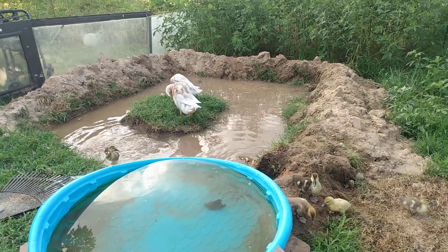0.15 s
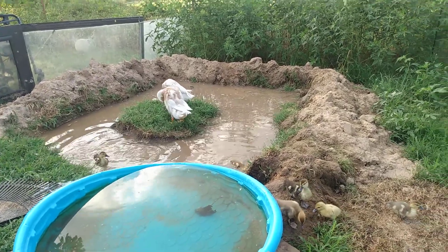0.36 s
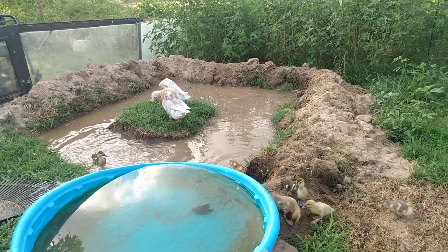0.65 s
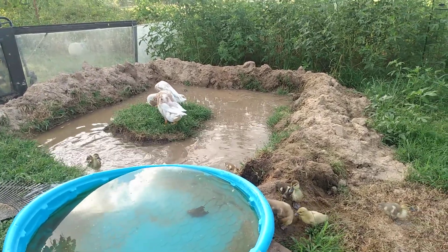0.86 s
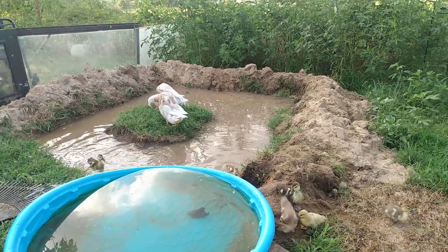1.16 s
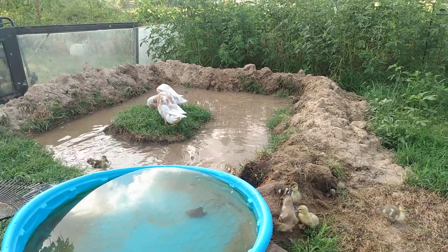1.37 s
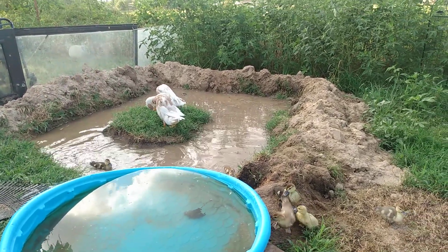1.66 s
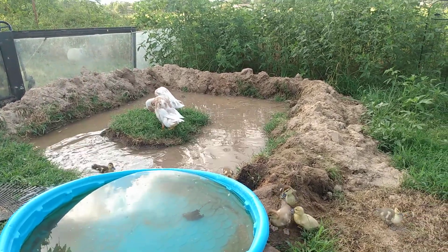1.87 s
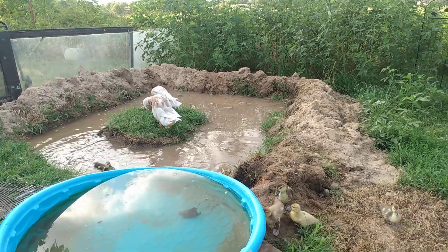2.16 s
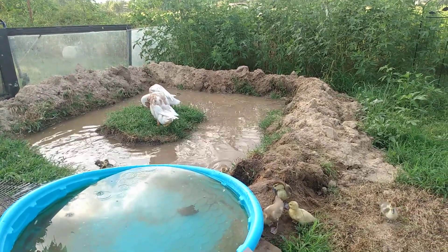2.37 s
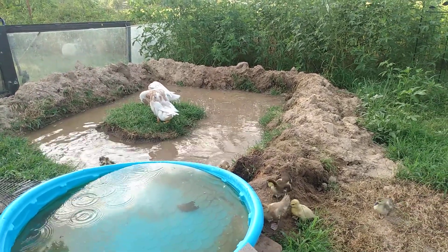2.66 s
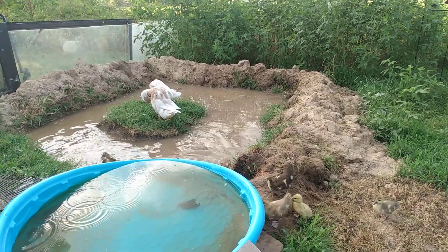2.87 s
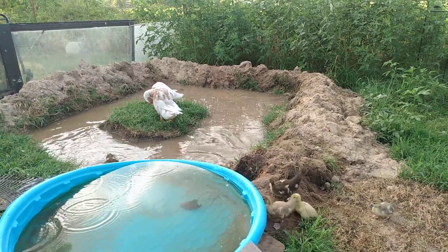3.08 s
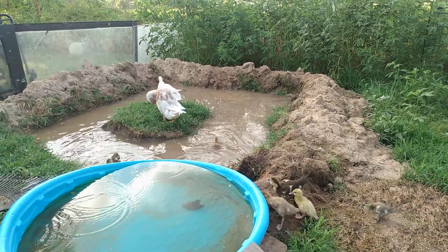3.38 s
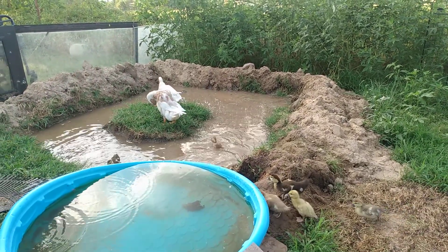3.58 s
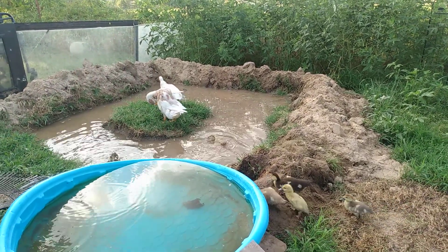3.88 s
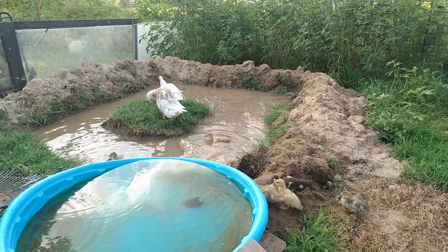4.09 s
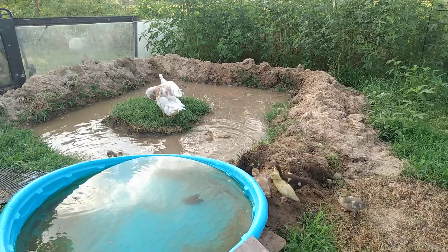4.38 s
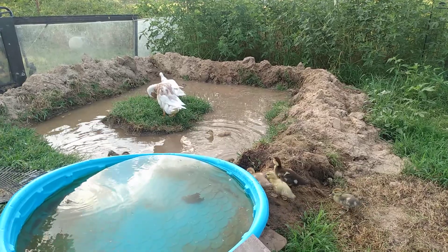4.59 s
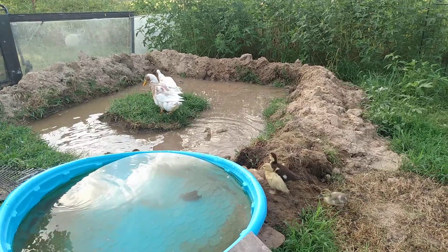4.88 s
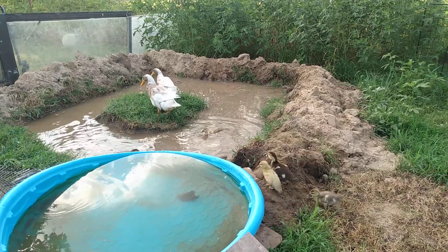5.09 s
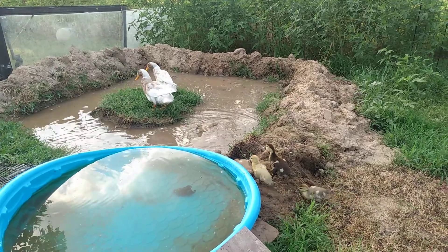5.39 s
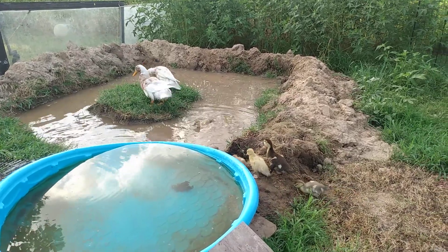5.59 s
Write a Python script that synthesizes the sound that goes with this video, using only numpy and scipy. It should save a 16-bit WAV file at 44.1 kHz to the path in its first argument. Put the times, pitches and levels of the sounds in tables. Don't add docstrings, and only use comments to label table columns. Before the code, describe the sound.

Water trickles and ticks in a small outdoor pond under low wind rumble, with a bright plop near two seconds and buzzing katydids.

```python
import sys
import numpy as np
from scipy import signal
from scipy.fft import rfft, irfft
from scipy.io import wavfile
from scipy.ndimage import uniform_filter1d

SR = 44100
rng = np.random.default_rng(int(sys.argv[2]) if len(sys.argv) > 2 else 0)


def magnitude_from_level(level_db):
    exponent = np.asarray(level_db, float) / 20
    return 10 ** exponent


def wav_record(signal):
    frames = np.transpose(np.atleast_2d(signal))
    bounded = np.clip(frames, -1, 1)
    quanta = np.round(bounded * 32767).astype(np.int16)
    wavfile.write(sys.argv[1], SR, quanta)


N = 253134
HZ = np.fft.rfftfreq(1024, 1 / SR)
LAG, SPLASH_LAG = 11, 6


def evened(x):
    return x / np.sqrt(np.mean(x ** 2) + 1e-20)


def read(points, hz):
    f, *columns = np.transpose(points)
    return np.array([np.interp(np.log(hz + 1), np.log(f + 1), c) for c in columns])


def follow(rows):
    s, *columns = np.transpose(rows)
    return np.array([np.interp(np.arange(N) / SR, s, c) for c in columns])


def add(mix, s, sound):
    part = mix[:, round(s * SR):][:, :sound.shape[1]]
    part += sound[:, :part.shape[1]]


def colour(x, db):
    hz = np.fft.rfftfreq(N, 1 / SR)
    return irfft(rfft(x, N) * magnitude_from_level([np.interp(hz, HZ, d) for d in db]), N)


def ports(same, lag=LAG):
    a, b = rng.standard_normal((2, N))
    return np.array([a, same * np.roll(a, lag) + np.sqrt(1 - np.clip(same, 0, 1) ** 2) * b])


def lumps(seconds, channels=1):
    size = int(seconds * SR)
    noise = rng.standard_normal((channels, N))
    return evened(uniform_filter1d(uniform_filter1d(noise, size), size))


def peak_db(hz, width):
    return -20 * np.log10(1 + (2 * (HZ - hz) / width) ** 2)


def sides(pan_db):
    return magnitude_from_level(np.array([pan_db / 2, -pan_db / 2]))


def sparse(count, spread_db):
    at, size = rng.random((count, 2)).T
    out = np.zeros(N)
    out[(at * N).astype(int)] = magnitude_from_level(spread_db * np.minimum(-np.log(size + 1e-9), 3.3))
    return out


def arch(u, edge_db):
    return edge_db * (2 * u - 1) ** 2


def around(times, weights, seconds, before=0.59):
    t = np.arange(0, N, 64) / SR
    u = (t - np.c_[times]) / seconds
    bells = np.exp(-np.where(u < 0, u / before, u) ** 2)
    return np.interp(np.arange(N) / SR, t, np.dot(weights, bells))


def whistles(events, glide, edge_db, fuzz_hz, lag):
    out = np.zeros((2, N))
    for s, length, db, *pitch in events:
        u = np.arange(0, length, 1 / SR) / length
        blur = 1 + fuzz_hz / 40 * lumps(1 / max(fuzz_hz, 5))[0, :len(u)]
        whistle = np.sin(2 * np.pi * np.cumsum(glide(u, *pitch)) / SR)
        tone = magnitude_from_level(db + arch(u, edge_db)) * evened(blur * whistle)
        add(out, s, sides(0.071)[:, None] * [tone, np.roll(tone, lag)])
    return out


# (time [s], strength [dB])
WIND_STRENGTH = [
    (0.0, -57.5),
    (0.25, -50.5),
    (0.65, -51.5),
    (1.7, -48),
    (1.95, -50),
    (2.15, -47),
    (4.2, -47.5),
    (5.74, -47),
]
# (frequency [Hz], density [dB per Hz])
WIND_TONE = [(12, -67), (20, -28), (27, -12), (46, -6.5), (92, 4), (157, -5.5), (222, -19.5), (249, -32.5),
             (276, -39.5), (420, -44), (550, -80), (920, -120)]
# (frequency [Hz], share [0-1])
WIND_SAME = [(40, .1), (100, .3), (200, .5), (400, .3)]
# (time [s], peak [dB], pitch [Hz], left-right [dB], push + or pull - [-1 to 1])
BUFFETS = [(0.307, -29, 115, 21, 0.74), (0.547, -29, 144, 28, 0.54), (1.191, -29, 91, 14, 0.76),
           (2.157, -25.5, 80, -5, 0.79), (2.4, -25, 97, -8.5, 0.69), (2.449, -30.5, 129, 25, 0.84),
           (2.524, -27.5, 93.5, -6, 0.66), (2.808, -27, 110, -13, 0.79), (2.876, -35, 164, -14.5, 1),
           (3.131, -38, 63.6, 17, 0.75), (3.217, -24, 112, -14, 0.65), (4.241, -26.5, 100, -11.5, 0.68),
           (4.55, -24, 119, 0.5, 0.39), (0.399, -33.5, 89.5, -11.5, 0.86), (0.653, -27.5, 101, -11, 0.6),
           (0.704, -31.5, 101, -6, 0.75), (0.831, -29, 79.5, -1, 0.67), (0.951, -33, 95, -5, 1),
           (1.274, -31.5, 90, -3, 0.72), (1.427, -29, 97, -6, 0.81), (1.555, -29, 89, 8, .7),
           (1.692, -28.5, 97, 5, 0.78), (2.617, -50, 89, -1, 0.6), (3.296, -24.5, 78.5, 5, 0.65),
           (3.574, -39, 92, -13, 0.65), (3.829, -36, 178, -13.5, 0.31), (3.897, -53, 93, 2, 0.58),
           (4.4, -44, 182, 6, 0.42), (4.868, -54, 135, -2, 0.52), (4.986, -44, 140, -2, 0.59),
           (5.076, -57, 102, 6, 0.43), (5.22, -41, 140, -2, 0.52), (5.283, -40, 109, -2, 0.69),
           (5.363, -31, 146, -2, 0.72), (5.546, -26, 115, 0, 0.66)]
# (time [s], peak [dB], pitch [Hz], left-right [dB], push + or pull - [-1 to 1])
SLAPS = [(2.043, -28.5, 179, 18, -0.79), (2.0581, -17, 101.5, 18, 0.43), (2.817, -34.5, 200, -21, -0.83),
         (3.139, -44, 234, 18, 1), (3.649, -30, 172, -20, 0.44), (4.401, -45, 165, -2, 0.75),
         (4.609, -30, 148, 2, 0.45), (4.669, -45, 167, 0, -0.0059), (5.473, -32, 145, 2, 0.79),
         (0.313, -44, 181, 12, 0.86), (1.199, -41.5, 210, -12, 0.43)]


def wind():
    when, _, _, side_db, _ = np.transpose(BUFFETS)
    gust_s = 0.058
    gust = around(when, np.ones(len(when)), gust_s)
    pan_db = 0.76 * around(when, side_db, gust_s)
    strength_db = follow(WIND_STRENGTH)[0]
    edge_db = -8 + 4.5 * (strength_db + 46) + 3.5 * gust
    strength_db = strength_db - 0.5 * gust

    a, b = rfft(rng.standard_normal((2, N)))
    same = np.clip(read(WIND_SAME, np.fft.rfftfreq(N, 1 / SR))[0], 0, 1)
    air = irfft([a, same * a + np.sqrt(1 - same ** 2) * b], N)
    body = evened(colour(air, read(WIND_TONE, HZ)[[0, 0]])) * magnitude_from_level(0.43 * lumps(0.021, channels=2))
    edge = evened(colour(air, [2 * peak_db(176.0, 182)] * 2))
    edge = edge * magnitude_from_level(edge_db - 5.5 + 4.17 * lumps(0.013, channels=2))
    out = (body + edge) * magnitude_from_level(strength_db + 2.24) * sides(pan_db)
    for s, db, hz, pan, way in BUFFETS + SLAPS:
        u = np.arange(-1, 1, hz / SR)
        push = way * np.sin(2 * np.pi * u) * np.exp(-(u / .5) ** 2) * np.cos(np.pi * u / 2)
        add(out, s - .5 / hz, magnitude_from_level(db - 4.5) * sides(np.clip(pan, -18, 18))[:, None] * push)
    return out


# (time [s], flow [dB])
FLOW = [(0.0, -58), (0.56, -58), (0.63, -61.5), (0.78, -57), (1.05, -61.5), (2.1, -58.5), (2.2, -56.5),
        (2.3, -59), (3.15, -60.5), (3.3, -58.5), (3.85, -63), (4.46, -60), (4.95, -63.5), (5.04, -60),
        (5.3, -61), (5.74, -60)]
# (frequency [Hz], left [dB], right [dB])
TRICKLE_TONE = [(2400, -27, -23), (3060, -5.5, -37), (3880, -7.5, -3), (4700, -0.5, -3), (5860, -4.5, 4.5),
                (6300, -15, 4), (6760, -3, -2), (7570, -7, -18), (9030, -8.5, -16), (13800, -67, -24)]
# (time [s], peak [dB], pitch [Hz])
TICKS = [(0.0253, -35, 5630), (0.1531, -30, 5400), (0.2918, -42, 4470), (0.4223, -36, 4330),
         (0.4445, -36, 5060), (0.5054, -33.5, 5370), (0.7415, -33.5, 4640), (0.7525, -38, 4500),
         (0.786, -65, 6060), (1.3128, -34, 5850), (1.368, -37, 5600), (1.425, -41, 4930),
         (1.817, -37.5, 5070), (1.9965, -40, 4200), (2.1774, -27, 6400), (2.291, -42, 4800),
         (2.3895, -40, 5530), (2.4042, -33, 4460), (2.4735, -36, 7000), (2.695, -30, 5950),
         (3.3235, -38, 6600), (3.4126, -36, 6300), (3.439, -31, 6300), (3.5214, -32, 6000),
         (4.208, -34, 5400), (4.211, -48, 3800), (4.045, -38, 6100), (4.073, -50, 5230), (4.466, -28, 5670),
         (4.5147, -34, 6140), (4.588, -32.5, 5860), (4.8624, -38, 6440), (5.0412, -33, 6050),
         (5.4938, -29, 5760), (0.5576, -35.5, 5550), (0.68, -41, 6460), (1.4565, -45, 4130),
         (1.5748, -43, 5040), (1.714, -44, 4330), (1.784, -49, 3800), (1.925, -53, 4700),
         (2.158, -44, 4400), (2.3321, -38, 5600), (2.8534, -53, 4400), (3.113, -42.5, 4370),
         (3.2695, -39, 6840), (3.372, -61, 6000), (3.791, -39, 4840), (3.839, -43, 5000),
         (4.4463, -57, 5990), (4.9793, -40.5, 5100), (5.023, -39, 5960), (5.458, -40, 6600),
         (5.5263, -49, 6700), (5.694, -36, 6100)]


def trickle():
    out = ports(0.72) * magnitude_from_level(2.0 * lumps(0.0053) + 2.5 * lumps(0.084))
    t = np.arange(300) / SR
    for hz in rng.uniform(3310, 8250, 14):
        ring = np.sin(2 * np.pi * hz * t) * t * hz * np.exp(-t * hz / 3.28)
        drop = signal.oaconvolve(sparse(count=220, spread_db=4.5), ring)[:N]
        out += magnitude_from_level(-12.0) * np.array([drop, np.roll(drop, LAG)])
    out = evened(colour(out, read(TRICKLE_TONE, HZ)))

    when, _, pitch = np.transpose(TICKS)
    spatter_s = 0.03
    flow_db = follow(FLOW)[0] + 1.5 * around(when, np.ones(len(when)), spatter_s, before=.1)
    large_db = -5.5 + 2.5 * around(when, np.log2(5800 / pitch), spatter_s, before=0.49)
    large = colour(out, [-10 * np.log10(1 + (HZ / 4900) ** 16)] * 2)
    out = magnitude_from_level(flow_db + 4.0) * (out - large + magnitude_from_level(large_db + 2.0) * large)

    ticks = np.zeros((2, N))
    t = np.arange(400) / SR
    for s, db, hz in TICKS:
        u = t * np.pi * hz * 0.6
        tick = magnitude_from_level(db - 10) * np.sin(2 * np.pi * hz * t) * u * np.exp(1 - u / 3.0)
        add(ticks, s, np.array([magnitude_from_level(-5.0) * tick, np.roll(tick, LAG)]))
    rebound_s, rebound_db = 0.011, -10
    return out + ticks + magnitude_from_level(rebound_db) * np.roll(ticks, int(rebound_s * SR), axis=1)


# (time [s], level [dB], pitch [Hz], t60 [s])
PLUNGES = [(0.0, -92, 2840, 0.082), (0.025, -65, 630, 0.6), (0.189, -53, 700, 0.63),
           (0.44, -58.5, 1290, 0.76), (1.744, -61, 1180, 0.2), (1.77, -56.5, 1450, 0.58),
           (1.996, -44, 2480, 0.8), (2.09, -55, 2570, 1), (2.039, -47, 1080, 0.37),
           (2.091, -48.5, 700, 0.58), (2.119, -47, 1180, 0.35), (2.215, -44.5, 730, 0.41),
           (2.22, -53, 1870, 0.39), (3.13, -62.5, 686, 0.95), (3.74, -60.5, 2800, 0.48),
           (4.19, -66, 3320, 0.64)]
# (start [s], length [s], level [dB], first pitch [Hz], last pitch [Hz])
SWISHES = [
    (0.026, 0.37, -66, 1870, 1500),
    (0.65, 0.084, -77, 930, 1510),
    (1.105, 0.69, -62, 1120, 1400),
    (1.375, 0.67, -58.5, 1590, 2580),
    (2.398, 0.15, -60, 2770, 2260),
    (2.467, 0.3, -70, 880, 1020),
    (3.66, 1, -82, 1130, 1230),
    (3.787, 0.67, -65.5, 2800, 2800),
    (4.42, 0.2, -70.5, 1700, 1820),
]


def stirring(hz):
    t, power = np.arange(0, N, 64) / SR, 0
    reach_db, rise_s = 19.5, .007
    for s, db, pitch_hz, t60 in PLUNGES:
        since = np.maximum(t - s, 0)
        level = magnitude_from_level(db - 60 * since / t60 - reach_db * abs(np.log2(hz / pitch_hz)))
        power = power + level ** 2 * np.minimum(since / rise_s, 1)
    for s, length, db, first_hz, last_hz in SWISHES:
        u = np.clip((t - s) / length, 0, 1)
        octaves = abs(np.log2(hz / first_hz) - u * np.log2(last_hz / first_hz))
        power = power + (magnitude_from_level(db - reach_db * octaves) * np.sin(np.pi * u)) ** 2
    return np.interp(np.arange(N) / SR, t, power)


def bubble(hz, t60, rise):
    t = np.arange(0, t60, 1 / SR)
    tone = np.sin(2 * np.pi * hz * t * (1 + rise * t / t60))
    return tone * magnitude_from_level(-60 * t / t60) * np.minimum(t / 0.0014, 1)


# (centre [Hz], width [Hz])
SLOSH_BANDS = [(600, 252), (1100, 650), (1800, 570), (2950, 1740)]
STILL_DB = [-84, -91.5, -84, -79]
# (time [s], peak [dB], pitch [Hz], left-right [dB])
BUBBLES = [(0.164, -42, 734, 3), (0.201, -35, 703, 7), (0.442, -43, 1420, 14), (0.517, -42, 1600, 3),
           (0.802, -57, 560, -2), (1.746, -36, 1430, 6), (1.748, -50, 920, 0), (1.746, -52, 1136, 14),
           (1.771, -44, 1370, -5), (1.935, -47, 610, 2), (2.003, -30, 2095, -13), (2.016, -47, 1350, -24),
           (2.042, -17, 1110, -2), (2.098, -27.5, 720, 2), (2.112, -33, 474, 5), (2.121, -38, 1387, -22),
           (2.132, -39, 1385, -21), (2.155, -38, 1105, -2), (2.217, -41, 994, 4), (2.228, -36, 563, 6),
           (2.482, -49, 670, -4), (2.578, -48.5, 424, 7), (2.623, -51, 421, 4), (2.73, -50, 545, -5),
           (3.96, -46, 594, -6), (4.182, -52, 627, -16), (4.448, -53, 1184, 15), (0.258, -42, 710, 7),
           (0.45, -55, 474, 2), (0.455, -45, 2020, -10), (0.6, -52, 1135, 7), (0.7, -59, 480, 9),
           (1.613, -47, 1700, 0), (1.649, -46, 1700, -1), (2.006, -44, 1116, -10), (2.056, -44, 3170, -14),
           (2.018, -35, 2200, -17), (2.026, -45, 1240, -6), (2.203, -46, 630, 10), (2.104, -41, 615, 1),
           (2.222, -40, 1870, -3), (2.258, -41, 1010, 0), (2.262, -53, 582, 7), (2.298, -43, 677, 3),
           (4.295, -55.5, 490, -13), (4.48, -48, 1740, -8)]


def paddling():
    out = np.zeros((2, N))
    for (hz, width), still_db in zip(SLOSH_BANDS, STILL_DB):
        stir = ports(0.29, lag=SPLASH_LAG) * magnitude_from_level(2.6 * lumps(0.012))
        for f in hz + width * rng.uniform(-0.548, 0.565, 5):
            ring = signal.oaconvolve(sparse(count=220, spread_db=2.5), bubble(f, 0.032, 0.095))[:N]
            stir += magnitude_from_level(-7.0) * np.array([ring, np.roll(ring, SPLASH_LAG)])
        slosh = evened(colour(stir, [peak_db(hz, width)] * 2))
        out += np.sqrt(magnitude_from_level(still_db) ** 2 + stirring(hz)) * slosh
    for s, db, hz, pan in BUBBLES:
        t60 = 0.086 * 2 ** (-(db + 40) / 11.5)
        ring = magnitude_from_level(db - 11.0) * bubble(hz, np.clip(t60, .01, .2), 0.028)
        add(out, s, sides(pan)[:, None] * [ring, np.roll(ring, SPLASH_LAG)])
    return out


# (frequency [Hz], share [0-1])
BOUNCE = [(300, 0.084), (2400, 0.078), (3600, 0.039), (5000, 0.12)]


def bounced(x):
    step_hz, first_hz = 541, 102
    hz = np.fft.rfftfreq(N, 1 / SR)
    share = read(BOUNCE, hz)[0]
    comb = 1 + share * np.exp(-2j * np.pi * (hz - first_hz) / step_hz)
    return irfft(rfft(x) * comb / np.sqrt(1 + share ** 2), N)


def rustle():
    k = np.arange(500)
    soft = np.exp(-k / 90) * np.minimum(k / 30, 1)
    crackle = signal.oaconvolve(sparse(count=260, spread_db=3.2), soft)[:N]
    tone = [peak_db(11400, 7400), peak_db(16200, 6600) - 19]
    return magnitude_from_level(-65.0 + 2.5 * lumps(.1)) * colour(ports(0.38) * (1 + 5.3 * crackle), tone)


# (pitch [Hz], level [dB])
WHINES = [(1671, -86), (1729, -86), (2132, -84), (3477, -85)]


def pump():
    out = np.zeros((2, N))
    for hz, db in WHINES:
        level_db = db - 1.1 * np.arange(N) / SR + 1.6 * lumps(0.25)
        out += magnitude_from_level(level_db) * np.sin(2 * np.pi * np.cumsum(hz + 1.51 * lumps(0.294)[0]) / SR)
    return out


# (frequency [Hz], left [dB per Hz], right [dB per Hz])
HISS = [(298, -113, -113), (1360, -112, -113), (1500, -119, -119), (1700, -113, -114), (2060, -109, -113),
        (2390, -119, -121), (3060, -103, -112), (3780, -107, -111), (4060, -99, -104), (5100, -100.5, -104),
        (8540, -96, -108), (11900, -96, -110), (13800, -99.5, -111), (16400, -103, -112)]


def port_hiss():
    return bounced(colour(ports(0), read(HISS, HZ))) * np.sqrt(SR / 2)


# (time [s], peak [dB], pitch [Hz], left-right [dB])
SNAPS = [(0.3327, -41, 11900, 31.0), (0.51, -39, 11000, 40), (1.1147, -44, 12300, 29.5),
         (1.1932, -48, 14800, 24.5), (2.1864, -46, 9800, 9.5), (2.5347, -34, 10900, 3),
         (2.6788, -43, 11500, 3), (2.7521, -49, 10100, 5), (2.9085, -32, 10500, -3),
         (3.4361, -44, 11900, 17), (5.474, -48, 9070, 27), (5.597, -40.5, 10500, 28.0)]


def snaps():
    out, t = np.zeros((2, N)), np.arange(800) / SR
    shape = np.exp(-t / .0013) * np.minimum(t / 0.0008, 1)
    for s, db, hz, pan in SNAPS:
        noise = rng.standard_normal(800)
        puff = uniform_filter1d(uniform_filter1d(noise, size=6), size=6)
        puff = puff * np.cos(2 * np.pi * hz * t) * shape
        gain = magnitude_from_level(db + 8.0) * sides(np.clip(pan, -15, 15))[:, None]
        add(out, s, gain * [puff, np.roll(puff, LAG)])
    return out


# (start [s], length [s], level [dB], first pitch [Hz], last pitch [Hz])
MURMURS = [(0.45, 0.3, -75, 480, 500), (0.68, 0.14, -72, 1150, 1400), (0.7, 0.25, -74, 1690, 1720),
           (2.38, 0.34, -68, 777, 1002), (2.52, 0.28, -72, 408, 559), (3.75, 0.35, -75, 2100, 2120),
           (3.82, 0.25, -71, 570, 630), (3.84, 0.45, -72, 1250, 1220), (3.86, 0.3, -74, 1080, 1050),
           (3.98, 0.36, -71, 896, 907), (4.15, 0.15, -72, 620, 610), (4.35, 0.4, -74, 2130, 2120),
           (4.4, 0.13, -72, 1230, 1240), (4.42, 0.12, -73, 720, 720), (4.5, 0.18, -74, 930, 930),
           (5.42, 0.034, -68, 2430, 2540), (5.485, 0.05, -65, 2520, 2480), (4.95, 0.3, -73, 560, 600),
           (3.55, 0.15, -72, 680, 660), (5.08, 0.12, -75, 1980, 1980), (3.985, 0.03, -64, 2750, 2950),
           (4.035, 0.03, -63, 2580, 2540), (2.9, 0.07, -72, 780, 620), (3.7, 0.12, -74, 1150, 900)]


def murmurs():
    def glide(u, first_hz, last_hz):
        return first_hz + u * (last_hz - first_hz)
    return whistles(MURMURS, glide, edge_db=-6, fuzz_hz=220., lag=SPLASH_LAG)


# (start [s], end [s], final level [dB], swell over the first part [dB])
SONG_HIGH = [
    (1.5, 2.922, -53.5, 11),
    (3.72, 4.485, -55, 5),
]
SONG_LOW = [
    (2.93, 3.715, -55, 9),
]
SONG_BRIEF = [
    (3.06, 3.28, -63.5, 60),
]
# (centre [Hz], width [Hz], left [dB], right [dB])
WING_HIGH = [(10000, 460, 4.5, -14), (10450, 1300, 1.5, -2.5), (10900, 430, 1, -9), (11450, 340, -6, -22),
             (12000, 1100, 0, -7), (8920, 870, -2, -15), (17400, 11700, -6, -18)]
WING_LOW = [(9070, 160, -2.5, 2.5), (8700, 300, 2, -8), (9900, 570, -0.5, -7), (11050, 600, -14, -3.5),
            (10500, 6400, -5, -13), (14900, 1900, -9, -17)]
WING_BRIEF = [(9900, 350, 0, -6)]


def katydid(songs, wing, stroke_hz, depth):
    turns = np.cumsum(stroke_hz * (1 + 0.0021 * lumps(0.25)[0])) / SR
    strokes = 1 - depth + depth * np.exp(1.1 * (np.cos(2 * np.pi * turns) - 1))
    tone = [10 * np.log10(sum(magnitude_from_level(row[k] + peak_db(*row[:2])) ** 2 for row in wing))
            for k in (2, 3)]
    scrape = evened(colour(ports(0.55) * strokes * magnitude_from_level(.6 * lumps(0.03)), tone))
    t, level = np.arange(N) / SR, 0
    for s, end, db, swell_db in songs:
        sounding = uniform_filter1d(1. * (t > s) * (t < end), size=1300)
        swell = swell_db * np.clip(1 - (t - s) / 0.95, 0, 1)
        level = level + magnitude_from_level(db + 4.0 - swell) * sounding
    return scrape * level


def katydids():
    high = katydid(SONG_HIGH, WING_HIGH, stroke_hz=123.9, depth=0.61)
    low = katydid(SONG_LOW, WING_LOW, stroke_hz=97.0, depth=0.39)
    return high + low + katydid(SONG_BRIEF, WING_BRIEF, stroke_hz=117.5, depth=0.3)


# (start [s], length [s], level [dB], top pitch [Hz])
PEEPS = [
    (1.665, 0.028, -51, 2850),
    (1.802, 0.045, -50, 3370),
    (1.999, 0.058, -52, 3380),
]


def duckling():
    def glide(u, top_hz):
        end_hz = 2450
        pitches = [top_hz * 0.91, top_hz * 0.9, top_hz, 0.2 * top_hz + 0.85 * end_hz, end_hz]
        return np.interp(u, [0, .14, .28, .68, 1], pitches)
    peeps = whistles(PEEPS, glide, edge_db=-12, fuzz_hz=1, lag=LAG)
    return peeps + magnitude_from_level(-19) * np.roll(peeps[::-1], 520, axis=1)


def scene():
    water = bounced(trickle() + paddling()) + murmurs()
    return wind() + water + rustle() + pump() + snaps() + katydids() + duckling()


# (centre [Hz], width [Hz], left [dB], right [dB])
SHADE = [(680, 355, -6, -1), (885, 77, 4.5, -4), (1500, 330, -6, -1.5), (1870, 150, -6, -5.5),
         (2170, 150, 0, -4.5), (2220, 82, 0.5, -5.5), (2446, 164, -3, 0.5), (2800, 49, -3.5, -1),
         (3020, 195, -1, -9), (3300, 55, -9, 4), (3610, 118, -1.5, 9.5), (3604, 78, -12, -10.5),
         (4240, 300, 1, -1), (8100, 240, 0, -14), (9520, 200, 1, -1), (10540, 240, 0, -9),
         (12450, 400, -0.5, -18)]


def body_shade(hz):
    return magnitude_from_level(sum(np.c_[left_db, right_db].T * np.exp(-((hz - f) / width) ** 2)
                   for f, width, left_db, right_db in SHADE))


# (frequency [Hz], left [dB per Hz], right [dB per Hz])
DROP_BELOW = [(288, -125, -125), (700, -114, -114), (1290, -116, -116), (2520, -111, -113),
              (3750, -104, -106), (3900, -112, -104), (6600, -110, -102), (8000, -110, -98),
              (10900, -110, -99), (11400, -110, -101), (13800, -110, -106), (15700, -108, -108)]
# (frequency [Hz], waver [dB])
FLUTTER = [(300, 5), (1000, 5.5), (3400, 4.5), (4000, 3), (8000, 2.5), (16000, 1.2)]


def weak_band_gain(hz, z):
    band = np.unique(np.round(10 * np.log2(1 + hz / 500) + hz / 300), return_inverse=True)[1]
    power = np.array([uniform_filter1d(2 * abs(z[:, band == k]) ** 2, size=3).mean(1)
                      for k in range(band.max() + 1)])
    waver = rng.standard_normal(power.shape)
    waver = waver + .7 * rng.standard_normal(power[:, :1].shape)
    waver = evened(uniform_filter1d(waver, size=3))
    flutter_db = read(FLUTTER, hz).T * waver[band].transpose(1, 0, 2)
    level_db = (10 * np.log10(power + 1e-20) + 2.0 * waver)[band].transpose(1, 0, 2)
    over_db = level_db + flutter_db - read(DROP_BELOW, hz)[:, :, None]
    kept = magnitude_from_level(-60 / (1 + np.exp(np.clip(over_db / .4, -30, 30))))
    flutter_db = flutter_db * np.clip((26 - over_db + flutter_db) / 12, .15, 1)
    return kept * magnitude_from_level(flutter_db)


# (frequency [Hz], gain [dB])
MIC = [(20, -12), (38, -7), (55, 0), (15600, 0), (15800, -60)]


def mic_limits(hz):
    return magnitude_from_level(read(MIC, hz).T)


def band_limit(x):
    return signal.sosfilt(signal.butter(12, 16620, fs=SR, output="sos"), x)


def record(dry):
    x = dry + port_hiss()
    hz, _, z = signal.stft(x, SR, nperseg=2048, noverlap=1024, scaling="psd")
    z = z * body_shade(hz)[:, :, None]
    z = z * weak_band_gain(hz, z) * mic_limits(hz)
    x = signal.istft(z, SR, nperseg=2048, noverlap=1024, scaling="psd")[1][:, :N]
    return band_limit(x)


dry = scene()
out = record(dry)
wav_record(out)
```